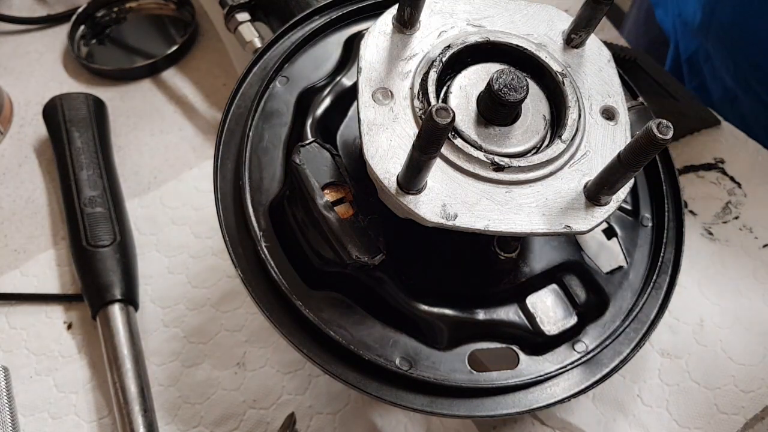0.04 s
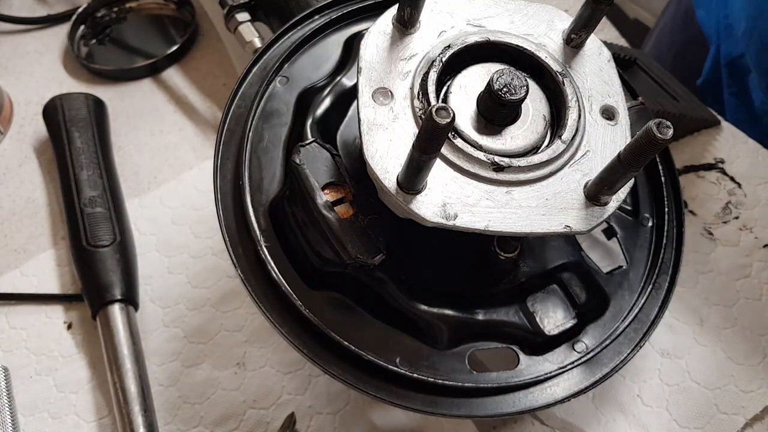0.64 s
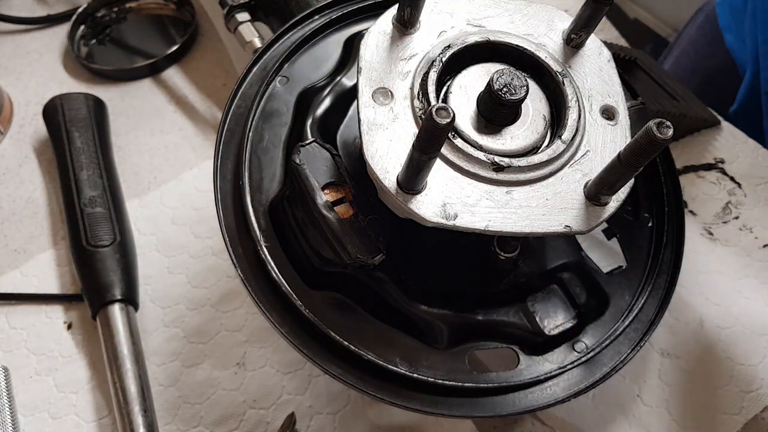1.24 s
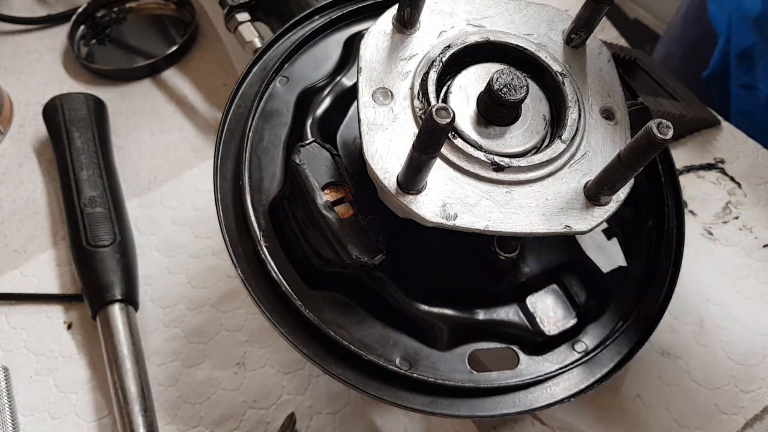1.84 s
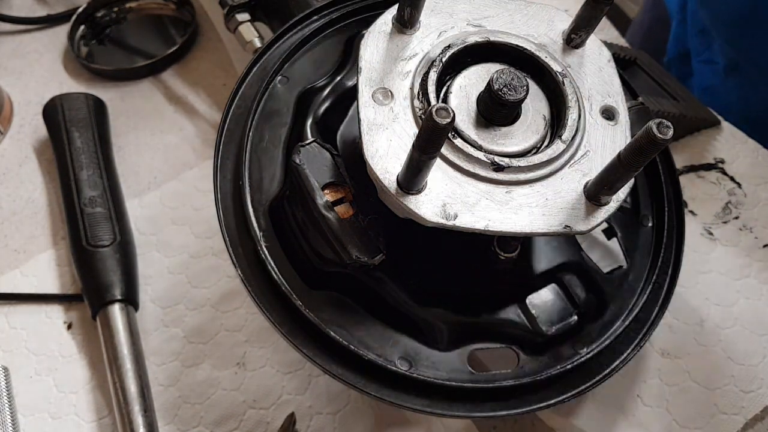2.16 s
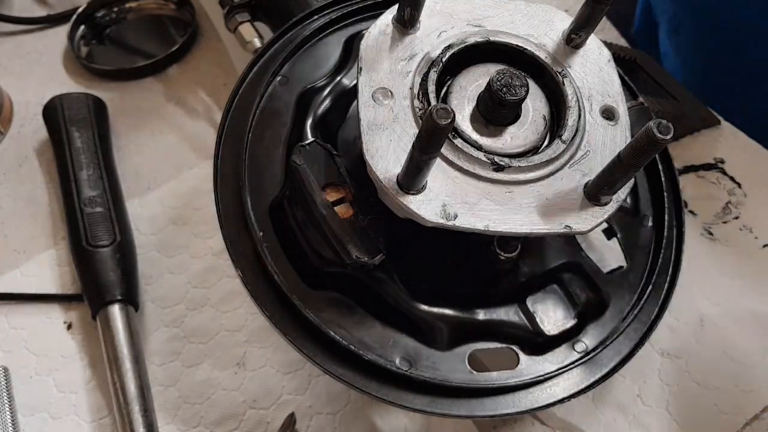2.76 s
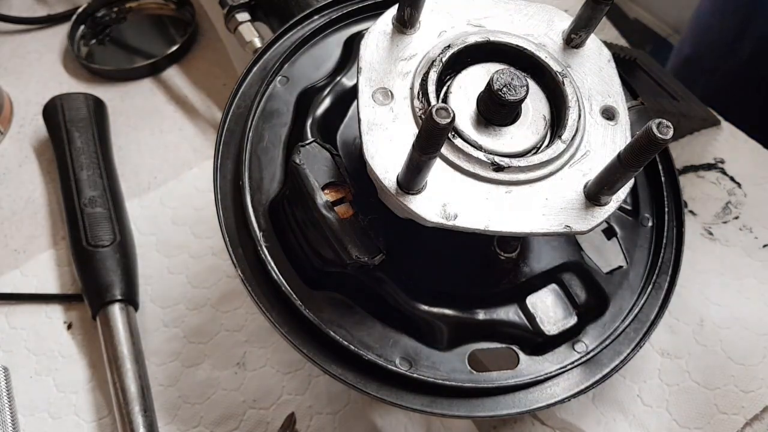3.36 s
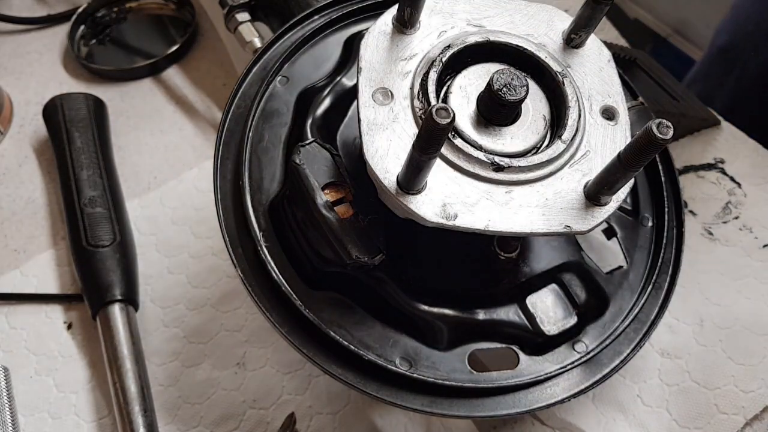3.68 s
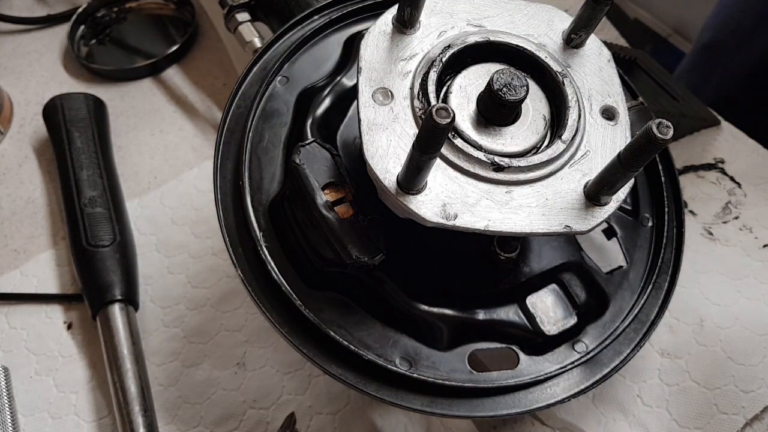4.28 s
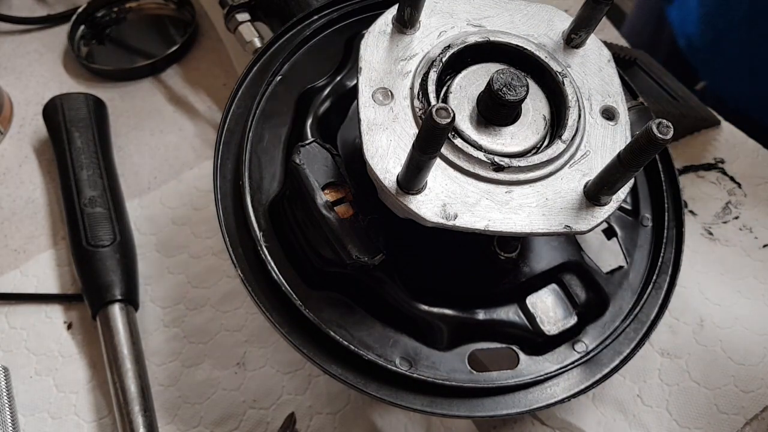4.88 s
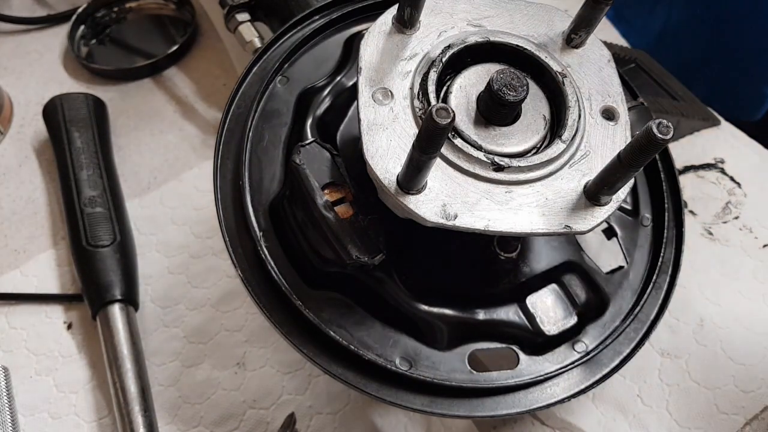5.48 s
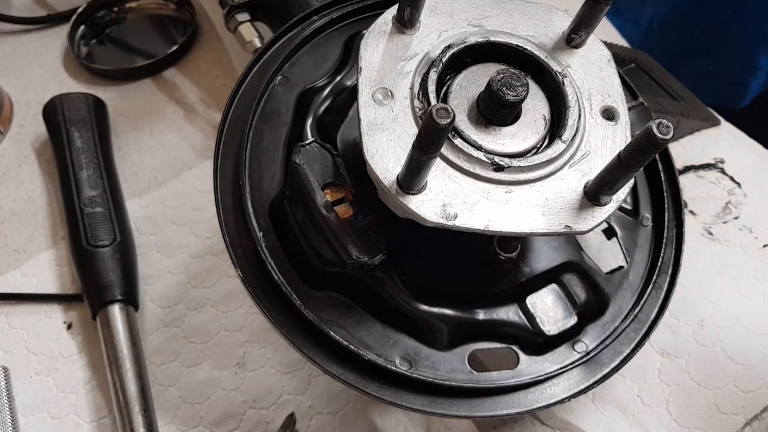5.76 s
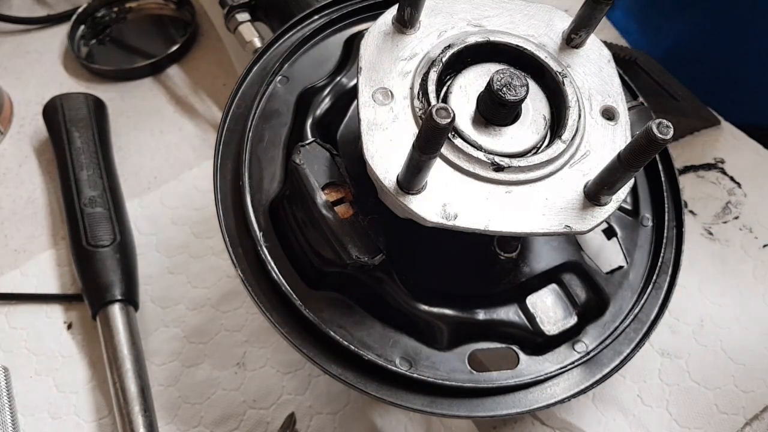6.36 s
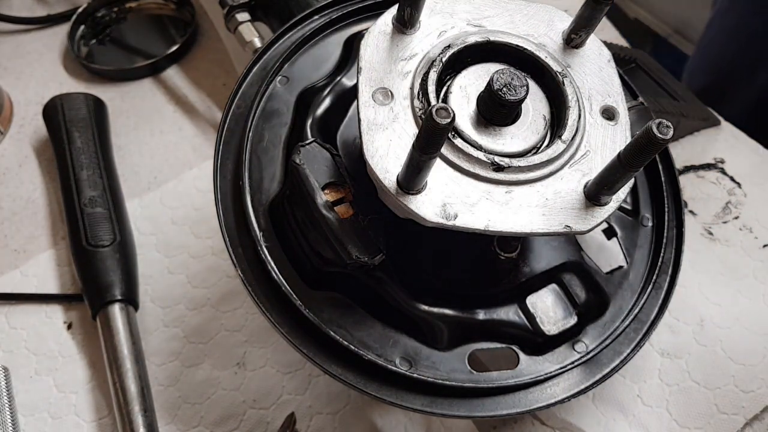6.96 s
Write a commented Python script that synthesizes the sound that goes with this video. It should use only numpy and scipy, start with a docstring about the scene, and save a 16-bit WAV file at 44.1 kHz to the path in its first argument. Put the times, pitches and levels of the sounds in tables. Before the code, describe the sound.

A cloth rag rubs and rustles in uneven strokes, with light ticks, a sharp clack and a dull thump on a workbench.

```python
"""A small workshop, a stereo microphone close to the bench. A cloth rag is rubbed in uneven strokes,
its threads catching and slipping. Around 1 s come a few light, hard ticks. At 4.6 s a hard object
clacks down, leaves nearby steel singing faintly and grates across the bench. At 5.6 s a dull thump
swings the bench top and rattles loose steel, and the rubbing carries on to the end.
Throughout, the room rings briefly over a low rumble."""
import sys
import numpy as np
from scipy import signal
from scipy.fft import rfft, irfft, next_fast_len
from scipy.io import wavfile
from scipy.ndimage import uniform_filter1d, map_coordinates

SR = 44100
rng = np.random.default_rng(int(sys.argv[2]) if len(sys.argv) > 2 else 0)


def inscribe(sig):
    """Save sig as 16-bit PCM at rate SR to the path in sys.argv[1].

    A 1-D sig is mono; a 2-D sig holds one channel per row.
    Samples are clipped to [-1, 1] before scaling.
    """
    pcm = np.round(np.clip(np.atleast_2d(sig).T, -1, 1) * 32767)
    wavfile.write(sys.argv[1], SR, pcm.astype(np.int16))


N = 313992

# Levels are relative. Likeness is how alike left and right are: 1 same, 0 unrelated, -1 opposite.
# strokes of the hand: (start [s], rise [s], hold [s], rub [dB], swish [dB], fibre hiss [dB])
HAND_STROKES = [(.095, 0.063, .005, -84, -88, -66.5), (.375, .08, .06, -75.5, -76, -74),
                (.522, 0.12, .025, -56, -49, -55.5), (.745, .025, .026, -53, -58, -74),
                (.875, 0.037, .14, -54, -49.5, -61), (1.118, 0.047, 0.023, -56.5, -48, -54),
                (1.303, 0.0079, .03, -55, -53, -49.5), (1.31, 0.068, 0.05, -48, -41.5, -46.5),
                (1.457, 0.056, .015, -51.5, -39.5, -43), (1.69, 0.065, .08, -67, -56.5, -56.5),
                (1.845, 0.045, 0.043, -49, -41.5, -45), (2.115, 0.012, .04, -62, -53, -62),
                (2.15, .08, 0.075, -55.5, -49, -55.5), (2.383, .066, 0.18, -62, -57, -61.5),
                (2.69, .06, .005, -55, -57.5, -66), (2.83, 0.053, 0.12, -54, -52.5, -58),
                (3.055, 0.067, 0.067, -48.5, -47, -52), (3.29, 0.17, .015, -48, -48, -52),
                (3.522, .05, .01, -45, -42, -46.5), (3.634, .025, .01, -46.5, -48, -49.5),
                (3.68, 0.091, .07, -48, -49.5, -58), (3.829, 0.071, 0.011, -43.5, -38.5, -42.5),
                (3.952, .072, 0.093, -49.5, -46.5, -51.5), (4.088, 0.049, 0.038, -44, -40.5, -44),
                (4.234, .024, .03, -50.5, -50, -57), (4.3, 0.059, 0.076, -55, -55, -61.5),
                (4.39, 0.18, .15, -42.5, -47.5, -53), (4.725, 0.076, 0.053, -39, -39.5, -46.5),
                (5.053, 0.075, 0.065, -65, -60.5, -68), (5.36, 0.081, 0.11, -74, -64.5, -69.5),
                (5.655, .041, 0.099, -47, -45.5, -48.5), (5.88, .066, 0.12, -61.5, -66, -68.5),
                (6.12, 0.25, .04, -57, -57.5, -63), (6.345, 0.13, 0.058, -38, -38, -46),
                (6.595, 0.077, 0.062, -46, -43, -48.5), (6.75, 0.083, 0.1, -50.5, -46, -52),
                (6.939, .039, 0.124, -55, -50.5, -55)]
# where the hands are in front of the microphone: (time [s], left over right [dB])
HAND_PAN = [(.5, -.5), (1.05, 1), (1.2, -3), (2.21, 3), (3.41, .5), (5.5, 3), (7.12, 1)]
# the rag's pressed rub, swish and fibre hiss: (frequency [Hz], level [dB])
RUB_SPECTRUM = [(120, -24), (270, -7), (370, -4), (560, -2.5), (1000, 0.5), (1400, -2), (2200, -6),
                (4500, -50)]
SWISH_SPECTRUM = [(500, -35.5), (1100, -11.5), (1450, -4), (1610, 2.5), (1780, -2), (2600, 0.5),
                  (4300, -1.5), (6000, -6.5), (8000, -13), (12000, -49.5)]
FIBRE_SPECTRUM = [(3000, -12.5), (5500, -1), (7200, -0.5), (8800, -2), (11500, 0.5), (13500, -2),
                  (15800, -8)]
# strokes that catch one resonance: (middle [s], length [s], frequency [Hz], level [dB])
SCUFF_STROKES = [(1.399, .077, 2700, -46.5), (1.403, .095, 302, -59), (1.411, .1, 590, -55.5),
                 (1.924, 0.04, 580, -48.5), (1.925, .035, 810, -51), (2.251, 0.25, 2050, -58.5),
                 (2.971, 0.045, 1620, -52), (4.78, 0.045, 530, -32), (6.45, 0.11, 1030, -46),
                 (6.451, 0.08, 368, -51)]
# stereo image of diffuse sound, of the swish and of the scuffs: (frequency [Hz], likeness [-1 to 1])
DIFFUSE_ALIKE = [(200, 0.72), (500, 0.72), (1000, 0.07), (3000, 0), (12000, 0)]
SWISH_LIKENESS = [(1300, .1), (1600, -0.63), (1900, 0.041), (12000, -0.044)]
SCUFF_LIKENESS = [(500, 0.87), (1000, 0.68), (2500, .3)]
# the object landing, edge first and then flat: (time [s], level [dB])
CLACK_CONTACTS = [(4.579, -20), (4.5843, -13), (4.589, -23), (4.597, -19.5)]
# the crack of each landing contact: (frequency [Hz], level [dB])
CRACK_SPECTRUM = [(100, -29), (280, -16.5), (480, -8), (850, -1), (1200, -8), (2000, -4), (2900, -14.5),
                  (4400, -14.5), (5400, -25.5), (7500, -24), (9000, -33.5), (12500, -31), (15800, -47.5)]
# modes that ring in the clack and colour the rub: (frequency [Hz], level [dB], t60 [s])
RING_MODES = [(352, 3.5, 0.23), (420, -7.5, .25), (515.3, 5, 0.2), (575, -7, .19), (732, 3, 0.24),
              (799, -3, .17), (870, -11, .13), (1062, -7.5, .15), (1302, -3.5, 0.129), (1510, -16, .135),
              (1690, -11, .1), (2050, -18, .16), (2280, -12.5, .28), (2490, -21, .25), (3840, -19, .18)]
# shoves that drag the object: (start [s], rise [s], hold [s], level [dB])
DRAG_SHOVES = [(4.6, 0.044, 0.011, -43.5), (4.738, 0.034, 0.057, -27.5)]
# the hollow of the dragged surface: (frequency [Hz], width [Hz], level [dB])
HOLLOW_MODES = [(160, 120, -13.5), (348, 41, -4.5), (574, 69, -3.5), (780, 97, -3), (990, 110, -6),
                (1270, 90, -5.5), (1650, 130, -7.5), (2210, 330, -12.5), (2840, 390, -14.5),
                (4230, 2200, -23), (6750, 2300, -48)]
# dull blows on the bench: (time [s], level [dB], hardness cutoff [Hz])
BENCH_BUMPS = [(1.307, -32.5, 120), (3.562, -31, 200), (4.264, -31, 200), (4.594, -22, 250),
               (4.861, -27, 251), (5.648, -12, 620), (6.459, -41, 400)]
# modes of the bench top: (frequency [Hz], level [dB], t60 [s])
BENCH_MODES = [(123, -5.5, 0.085), (132.2, -16, .37), (147.6, 0, 0.084), (213, -12.5, 0.13),
               (401, -11, 0.13), (563, 2, 0.037)]
# light hard contacts: (time [s], level [dB], brightness peak [Hz])
TICK_CONTACTS = [(.763, -33, 1200), (.781, -30.5, 8400), (0.813, -20.5, 5530), (.896, -22.5, 3740),
                 (.936, -27, 3730), (.967, -31, 3900), (.996, -30.5, 4000), (1.02, -31.5, 9700),
                 (1.043, -31.5, 4700)]
# the crack of a tick: (frequency [Hz], level [dB])
TICK_SPECTRUM = [(200, -17), (1000, 0), (2200, 5.5), (3000, -5.5), (5900, 4), (7000, -4.5), (9000, -11),
                 (12000, -12), (15800, -26)]
# the ring of a tick: (frequency [Hz], level [dB], t60 [s], likeness [-1 to 1])
PING_MODES = [(1665, -1.5, 0.09, -0.83), (2880, 2.5, 0.054, 0), (3300, -1, 0.055, .5),
              (4130, -3, 0.066, .3), (6040, -8, 0.053, 0)]
# thin steel rattled by the thump: (frequency [Hz], level [dB])
RATTLE_SPECTRUM = [(700, 3), (1200, 1.5), (2000, -17), (3300, -13.5), (3630, -21.5), (4000, -7),
                   (4900, -12), (5200, 2), (5500, -12), (9000, -18), (12000, -17), (15800, -28.5)]
# nearby steel singing after the clack: (frequency [Hz], level [dB], t60 [s])
STEEL_MODES = [(2044, -68, 1.6), (2540, -68.5, 3.9), (2606, -67.5, 2.7)]
# the workshop's decay: (frequency [Hz], t60 [s])
ROOM_DECAY = [(120, 0.31), (500, 0.41), (2500, 0.55), (6000, 0.51), (14000, 0.248)]
# swells of the deep drone: (time [s], level [dB])
DRONE_LEVELS = [(0, -73), (1, -70), (2.2, -69), (2.55, -61), (2.9, -65), (3.3, -64), (4.2, -55),
                (4.6, -76.5), (6.1, -72), (6.5, -57), (7.12, -71)]
# the room tone: (frequency [Hz], level [dB])
ROOM_TONE_SPECTRUM = [(12, -51), (20, -9.5), (42, -17.5), (59, -12), (76, 4), (259, -27), (298, -21),
                      (1500, -34), (3080, -33.5), (7110, -35), (8640, -34.5), (9390, -39), (12800, -32),
                      (15500, -39)]

STROKE_T60_S, SHOVE_T60_S = 0.47, 0.27  # the cloth settles, the object comes to rest
BOOM_REST_DB, BOOM_RUB_DB, BOOM_DRAG_DB, BOOM_BUMP_DB = -67, -8.5, -20, -28
TOP_HZ = 15800


def rag(pressure, speed, brushing):
    """The rag, close up: pressure gives a coarse, resonant rub, speed a swish, brushing a fibre hiss."""
    folds_db = 1.17 * wobble(55)  # folds slide past one after another
    coarse = shifting_folds(friction(rate=2200, spread_db=1.5, smooth=1.0), patchy_db=3)
    fine = shifting_folds(friction(rate=3000, spread_db=1.0, smooth=1.56), patchy_db=3.5)
    rub_db = lambda hz: along(RUB_SPECTRUM, hz) + resonance_db(hz, lift_db=3.5, width_hz=10)
    rub = stereo(coarse, rub_db, DIFFUSE_ALIKE)
    swish = stereo(fine, lambda hz: along(SWISH_SPECTRUM, hz), SWISH_LIKENESS)
    finest = friction(rate=5000, spread_db=-0.5, smooth=0.77)
    fibres = stereo(finest, lambda hz: along(FIBRE_SPECTRUM, hz), DIFFUSE_ALIKE)
    cloth = pressure * rub + speed * swish + panned(brushing * fibres, pan_db=-1.5)
    return panned(cloth * amp(folds_db), curves(HAND_PAN)[0])


def friction(rate, spread_db, smooth):
    """Surfaces catch and let go: rate tiny slips a second, uneven in size, over a smooth rush."""
    size = amp(spread_db * np.minimum(rng.exponential(size=N), 4))
    slips = (rng.random(N) < rate / SR) * size * rng.standard_normal((2, N))
    return unit(slips) + smooth * white(N)


def shifting_folds(pair, patchy_db):
    """The cloth keeps changing shape, so its colour shifts in short patches."""
    spectra = signal.stft(pair, nperseg=512)[2]
    patches = uniform_filter1d(rng.standard_normal(spectra.shape[1:]), size=5, axis=0)
    patches = uniform_filter1d(patches, size=14, axis=1)
    hz = np.linspace(0, SR / 2, len(patches))[:, None]
    depth_db = patchy_db / (1 + hz / 5000)  # the high hiss stays smooth
    return signal.istft(spectra * amp(depth_db * unit(patches)), nperseg=512)[1][:, :N]


def resonance_db(hz, lift_db, width_hz):
    """The lift that rubbing gets near each ringing mode."""
    return lift_db * sum(amp(db / 2) / (1 + ((hz - f) / width_hz) ** 2) for f, db, _ in RING_MODES)


def scuffs():
    """Brief rubs that swell and fade in one narrow resonance."""
    out, t = np.zeros((2, N)), np.arange(SR // 2) / SR
    middle = t[-1] / 2
    for s, length, hz, db in SCUFF_STROKES:
        noise = narrow(len(t), hz, width=0.093, alike=along(SCUFF_LIKENESS, hz))
        add(out, s - middle, amp(db) * noise * np.exp(-2 * ((t - middle) / length) ** 2))
    return out


def clack():
    """A hard object lands on the bench in quick contacts, each a crack and a ring."""
    out, t = np.zeros((2, N)), np.arange(SR * 3 // 4) / SR
    attack = 1 - np.exp(-t / 0.00028)
    for s, db in CLACK_CONTACTS:
        crack = coloured(len(t), CRACK_SPECTRUM, alike=[(400, 0.46), (1200, 0.16), (5000, 0.16)])
        ring = 0
        for hz, mode_db, t60 in RING_MODES:
            phase = rng.uniform(0, 2 * np.pi) + 0.39 * rng.standard_normal((2, 1))
            decay = amp(mode_db + rng.normal(0, 2.0) - 60 * t / t60)
            ring = ring + decay * np.sin(2 * np.pi * hz * t + phase)
        add(out, s, amp(db) * (crack * amp(-60 * t / 0.056) + amp(-15.5) * ring) * attack)
    return panned(out, pan_db=1.0)


def drag(push):
    """The object grates across the bench: dense slips sound its hollow."""
    def hollow_db(hz):
        power = sum(amp(2 * db) * (hz * width) ** 2 / ((f * f - hz * hz) ** 2 + (hz * width) ** 2)
                    for f, width, db in HOLLOW_MODES)
        return 10 * np.log10(1e-12 + power)
    slips = friction(rate=3700, spread_db=2.0, smooth=0.51)
    grate = stereo(slips, hollow_db, alike=[(300, 0.83), (700, 0.88), (1200, .2), (5000, .15)])
    return panned(grate * push, pan_db=0.5)


def bumps():
    """Left of centre, soft blows set the bench top swinging; harder ones reach its higher modes."""
    out, t = np.zeros((2, N)), np.arange(SR * 3 // 4) / SR
    press = np.sin(np.pi / 2 * np.minimum(t / .006, 1)) ** 2  # a padded contact builds up gently
    for s, db, hard_hz in BENCH_BUMPS:
        swing = sum(amp(mode_db - 60 * t / t60) * np.sin(2 * np.pi * hz * t) / (1 + (hz / hard_hz) ** 2)
                    for hz, mode_db, t60 in BENCH_MODES)
        add(out, s, amp(db) * swing[None] * press)
    radiated = highpass(out, cutoff_hz=70)  # the board radiates little deep bass
    return panned(radiated, pan_db=4.0)


def ticks():
    """Small hard contacts: a brief crack, each with its own brightness, and a short ping."""
    out, t = np.zeros((2, N)), np.arange(SR // 8) / SR
    attack = 1 - np.exp(-t / 0.00032)
    for s, db, bright_hz in TICK_CONTACTS:
        peak_db = lambda hz: 11 / (1 + (np.log2((hz + 1) / bright_hz) / 0.44) ** 2)
        colour_db = lambda hz: along(TICK_SPECTRUM, hz) + peak_db(hz)
        crack = stereo(white(len(t)), colour_db, alike=[(3000, 0.16)])
        ping = sum(amp(mode_db - 60 * t / t60) * narrow(len(t), hz, width=0.022, alike=alike)
                   for hz, mode_db, t60, alike in PING_MODES)
        add(out, s, amp(db - 6.5) * (crack * amp(-60 * t / 0.041) + amp(-10) * ping) * attack)
    return out


def steel_rattle():
    """The hardest bump jolts loose steel into a short bright rattle."""
    out, t = np.zeros((2, N)), np.arange(SR // 2) / SR
    thump_s = max(BENCH_BUMPS, key=lambda row: row[1])[0]
    noise = coloured(len(t), RATTLE_SPECTRUM, DIFFUSE_ALIKE)
    add(out, thump_s, amp(-40) * noise * amp(-60 * t / 0.72))
    return out


def steel_ring():
    """The clack leaves a faint, beating note in nearby steel."""
    out, t = np.zeros((2, N)), np.arange(SR * 2) / SR
    clack_s = CLACK_CONTACTS[0][0]
    for hz, db, t60 in STEEL_MODES:
        phase = rng.uniform(0, 2 * np.pi) + .6 * rng.standard_normal((2, 1))
        add(out, clack_s, amp(db + 3 - 60 * t / t60) * np.sin(2 * np.pi * hz * t + phase))
    return out


def bench_boom(pressure, push):
    """The bench booms softly: more under a pressing hand or a dragged object, and after each bump."""
    spectrum = [(35, -29.5), (75, -9.0), (118, 4.5), (160, -2.5), (210, -11), (300, -28), (600, -36.5)]
    noise = coloured(N, spectrum, alike=[(100, 0.96)])
    rise_s = 0.025
    jolts, = movements([(s, rise_s, 0, db) for s, db, _ in BENCH_BUMPS], t60=.9)
    power = (amp(BOOM_REST_DB) ** 2 + (amp(BOOM_RUB_DB) * pressure) ** 2
             + (amp(BOOM_DRAG_DB) * push) ** 2 + (amp(BOOM_BUMP_DB) * jolts) ** 2)
    return panned(np.sqrt(power) * noise, pan_db=1.5)


def bench_echoes(x, echo_db):
    """Bounces off the bench and nearby parts comb the sound, differently in each channel."""
    taps = np.zeros((2, SR // 60))
    for channel in taps:
        channel[rng.integers(SR // 700, len(channel), size=7)] = amp(echo_db) * rng.choice([-1, 1], 7)
    taps = highpass(taps, cutoff_hz=900)  # small parts reflect only short waves
    return x + signal.fftconvolve(x, taps, axes=1)[:, :N]


def room(x):
    """The workshop's diffuse tail reaches the microphone about 7 ms behind the direct sound."""
    hz, t, spectra = signal.stft(white(SR * 3 // 4), SR, nperseg=256)
    decay = amp(-60 * t / along(ROOM_DECAY, hz)[:, None])
    tail = signal.istft(spectra * decay, SR, nperseg=256)[1]
    tail = stereo(tail, np.zeros_like, DIFFUSE_ALIKE) / np.sqrt(tail.shape[1])
    tail = np.pad(tail, ((0, 0), (SR // 150, 0)))
    return signal.fftconvolve(x, tail, axes=1)[:, :N]


def drone():
    """A deep rumble comes and goes in the background."""
    return amp(curves(DRONE_LEVELS)[0]) * narrow(N, centre_hz=70, width=0.29, alike=0.99)


def room_tone():
    """Steady low rumble and faint hiss."""
    return amp(-64.5) * coloured(N, ROOM_TONE_SPECTRUM, alike=[(100, 0.88), (1000, .3), (8000, 0.067)])


def movements(rows, t60):
    """One gain curve per dB column: each movement rises, holds and dies away; overlaps add in power."""
    power = 0
    for start, rise, hold, *levels in rows:
        t = np.arange(N) / SR - start
        attack = np.sin(np.pi / 2 * np.clip(t / rise, 0, 1))
        decay = amp(-60 * np.maximum(t - rise - hold, 0) / t60)
        power = power + np.outer(amp(levels), attack * decay) ** 2
    return np.sqrt(power)


def amp(db):
    """Decibels to gain."""
    return 10 ** (np.asarray(db) / 20)


def unit(x):
    """Scale to rms 1."""
    return x / np.sqrt(np.mean(x ** 2) + 1e-20)


def along(points, hz):
    """Read (frequency [Hz], value) points on a log axis."""
    freqs, values = np.transpose(points)
    return np.interp(np.log(hz + 1), np.log(freqs + 1), values)


def curves(rows):
    """One value per sample for each column after the time."""
    times, *columns = np.transpose(rows)
    return [np.interp(np.arange(N) / SR, times, column) for column in columns]


def wobble(rate):
    """A smooth random curve, rate knots a second."""
    knots = rng.standard_normal(int(N * rate / SR) + 4)
    return map_coordinates(knots, [np.arange(N) * rate / SR])


def filtered(x, response):
    """Multiply the spectrum of x by response(hz)."""
    count = x.shape[-1]
    padded = next_fast_len(count + SR // 4)
    return irfft(rfft(x, padded) * response(np.fft.rfftfreq(padded, 1 / SR)), padded)[..., :count]


def highpass(x, cutoff_hz):
    """First-order bass roll-off."""
    return filtered(x, lambda hz: 1j * hz / (1j * hz + cutoff_hz))


def stereo(pair, gain_db, alike):
    """Colour two unrelated signals and blend them as mid and side into left and right, rms 1."""
    turn = lambda hz: np.arccos(np.clip(along(alike, hz), -1, 1)) / 2
    mid, side = filtered(pair, lambda hz: amp(gain_db(hz)) * [np.cos(turn(hz)), np.sin(turn(hz))])
    return unit(np.array([mid + side, mid - side]))


def white(count):
    """Two unrelated white noises."""
    return rng.standard_normal((2, count))


def coloured(count, spectrum, alike):
    """Stereo noise shaped by (frequency [Hz], level [dB]) points."""
    return stereo(white(count), lambda hz: along(spectrum, hz), alike)


def narrow(count, centre_hz, width, alike):
    """Stereo noise in one resonance; width is a share of its frequency."""
    band_db = lambda hz: -20 * np.log10(1 + ((hz / centre_hz - 1) / width) ** 2)
    return stereo(white(count), band_db, [(centre_hz, alike)])


def panned(x, pan_db):
    """Lean to the left by pan_db."""
    return x * amp(np.array([[.5], [-.5]]) * pan_db)


def add(track, s, sound):
    """Mix a sound in at time s."""
    start = round(s * SR)
    track[:, start:start + sound.shape[-1]] += sound[:, :N - start]


def scene():
    """Rustle and knocks close to the microphone, the workshop behind them."""
    pressure, speed, brushing = movements(HAND_STROKES, STROKE_T60_S)
    push, = movements(DRAG_SHOVES, SHOVE_T60_S)
    cloth = amp(-0.5) * bench_echoes(rag(pressure, speed, brushing), echo_db=-20) + scuffs()
    small = ticks() + steel_rattle()
    hard = clack() + drag(push)
    dull = bumps()
    direct = cloth + small + hard + dull + steel_ring()
    room_send = amp(-13) * cloth + amp(-13.5) * small + amp(-8.0) * hard + amp(-7.5) * dull
    return direct + room(room_send) + bench_boom(pressure, push) + drone() + room_tone()


def record(dry):
    """Nothing passes above the band limit."""
    return filtered(dry, lambda hz: hz < TOP_HZ)


dry = scene()
out = record(dry)
inscribe(out)
```